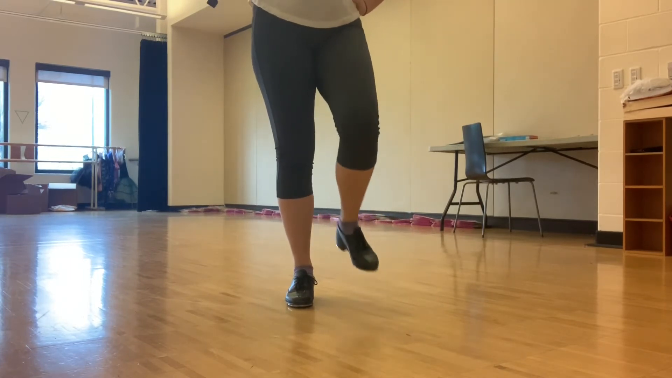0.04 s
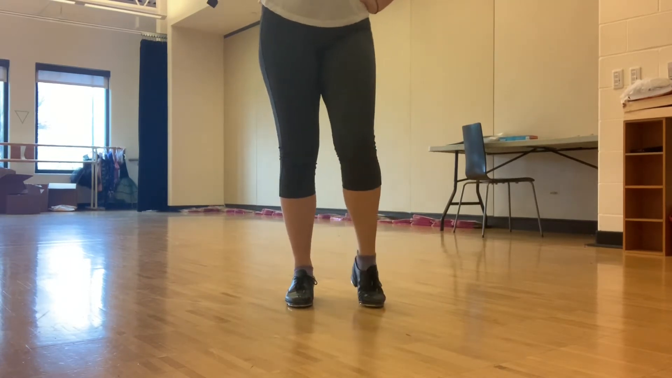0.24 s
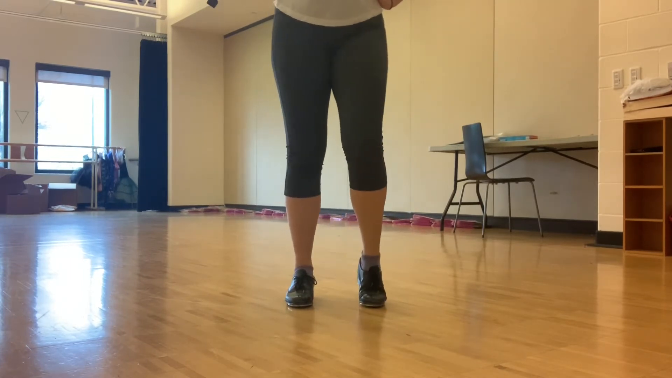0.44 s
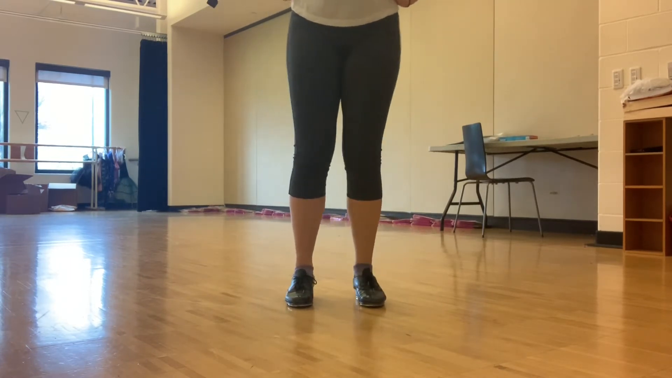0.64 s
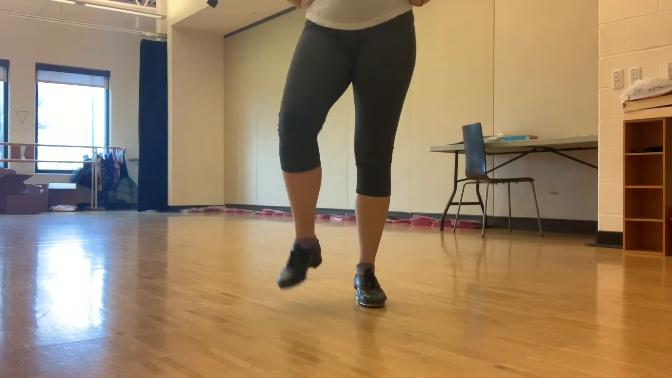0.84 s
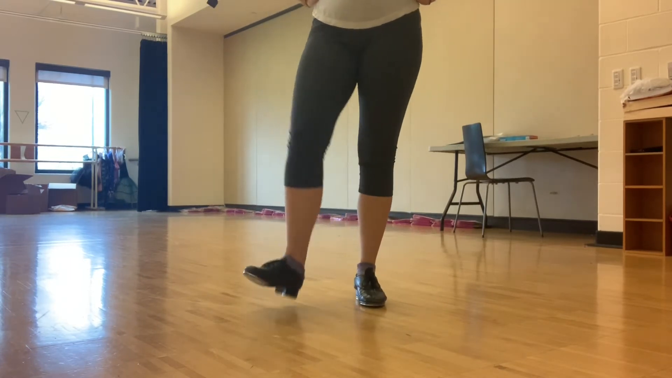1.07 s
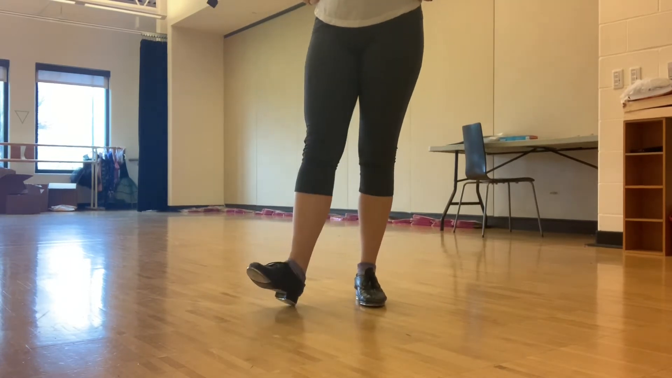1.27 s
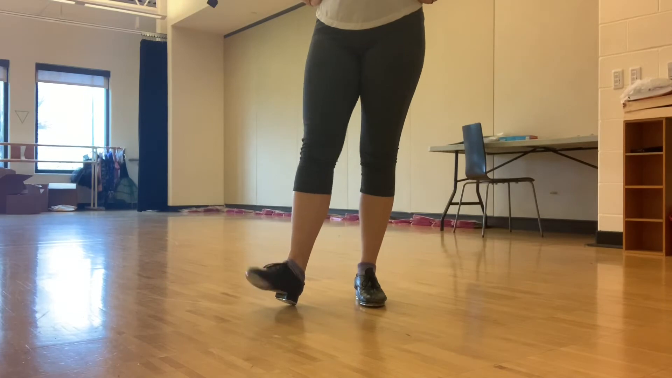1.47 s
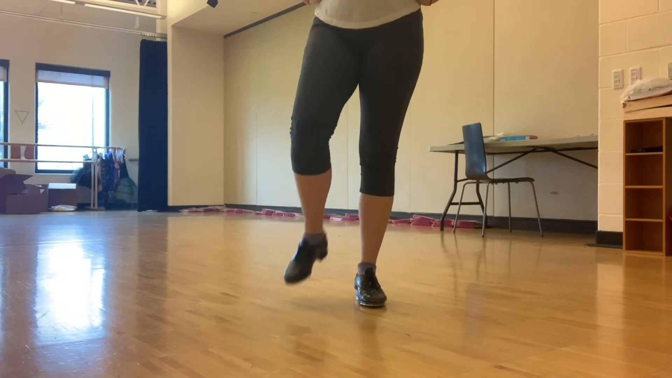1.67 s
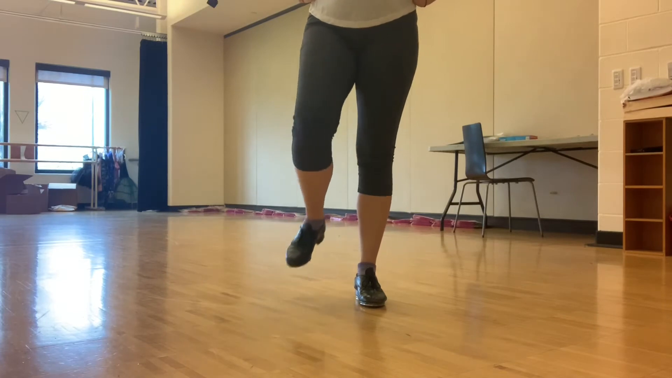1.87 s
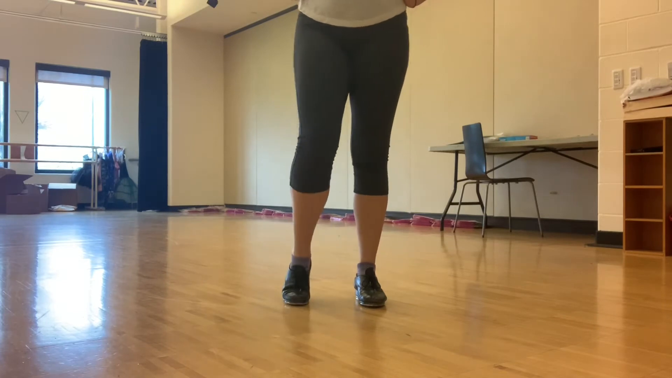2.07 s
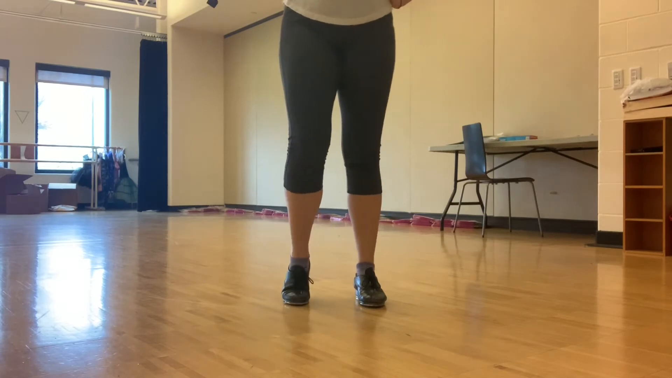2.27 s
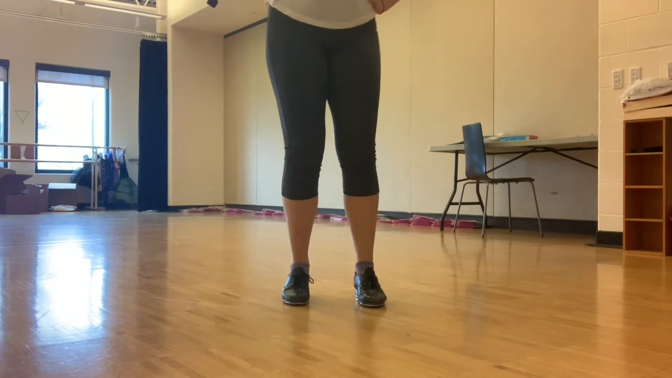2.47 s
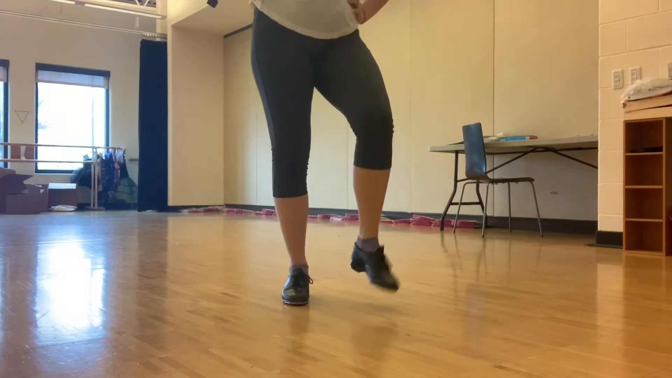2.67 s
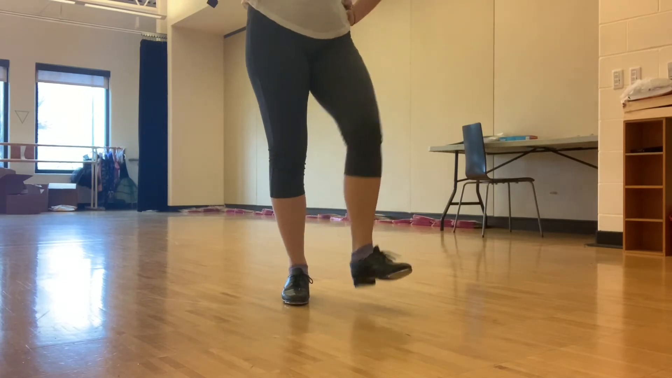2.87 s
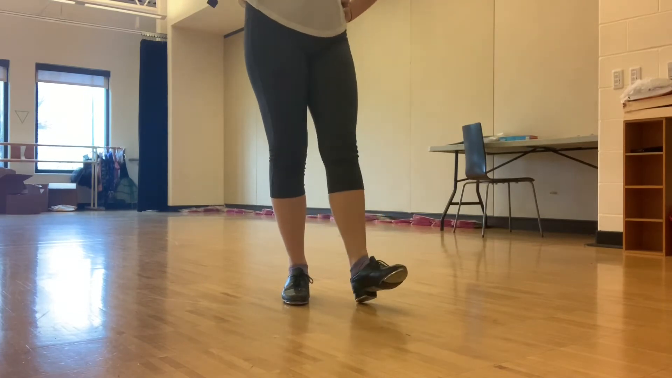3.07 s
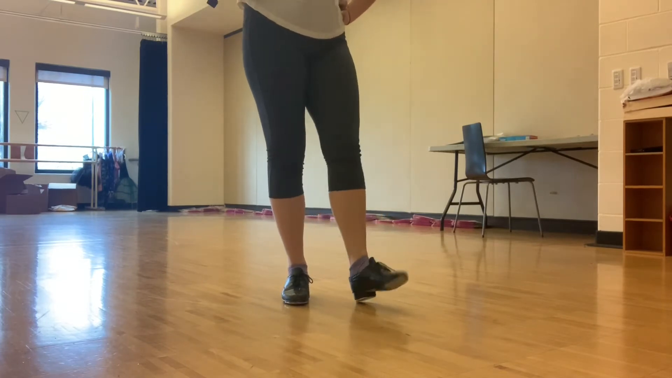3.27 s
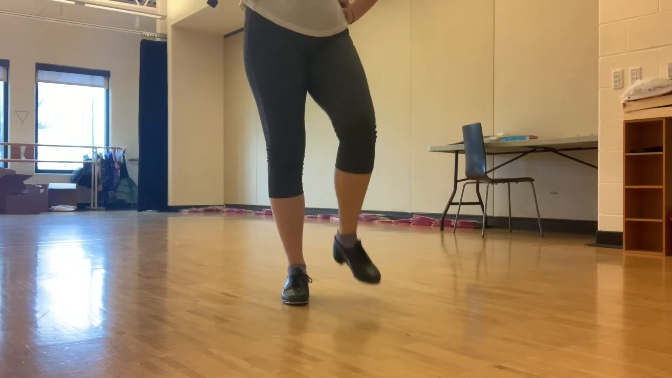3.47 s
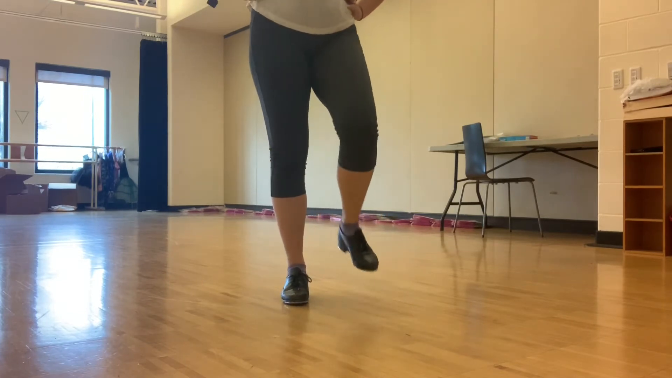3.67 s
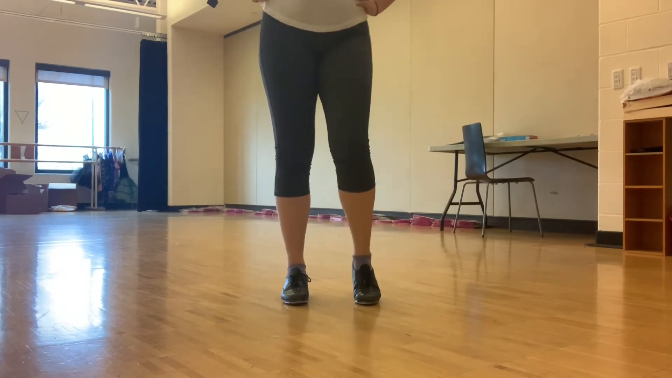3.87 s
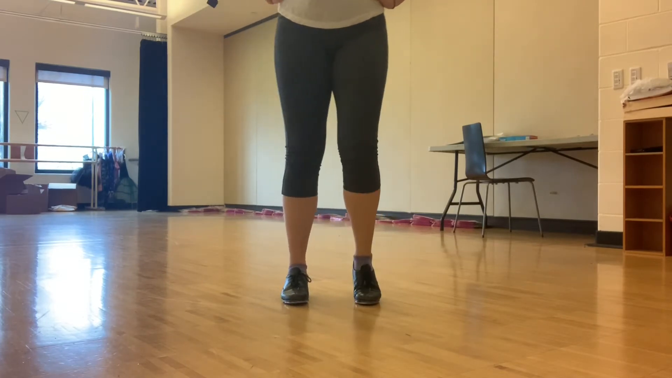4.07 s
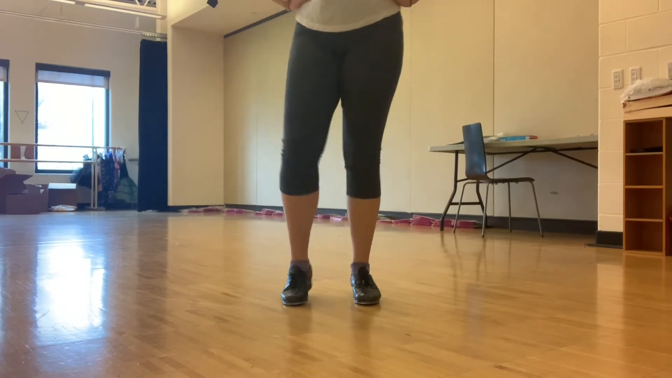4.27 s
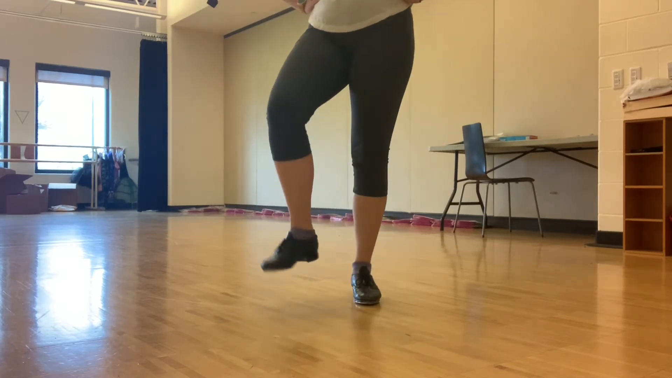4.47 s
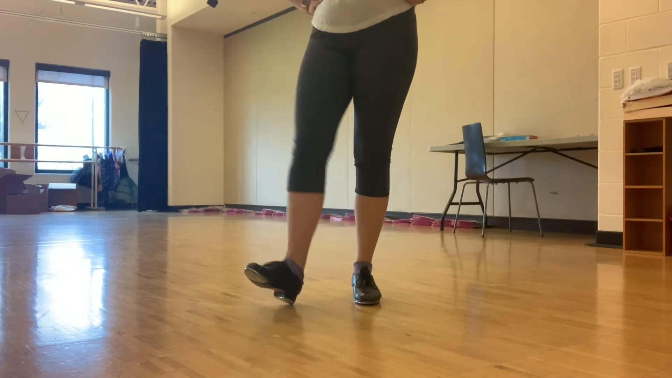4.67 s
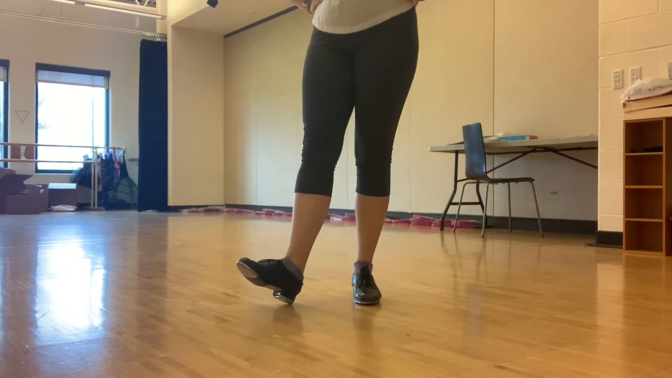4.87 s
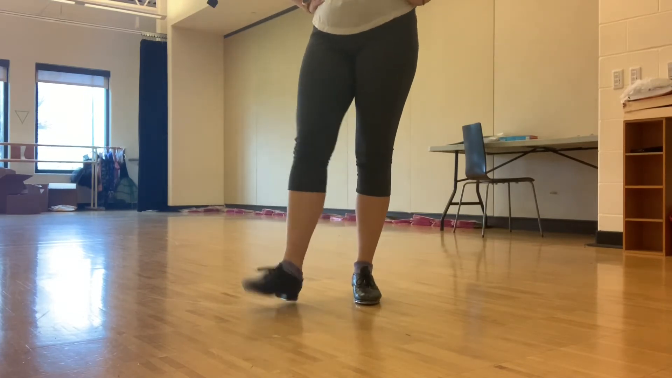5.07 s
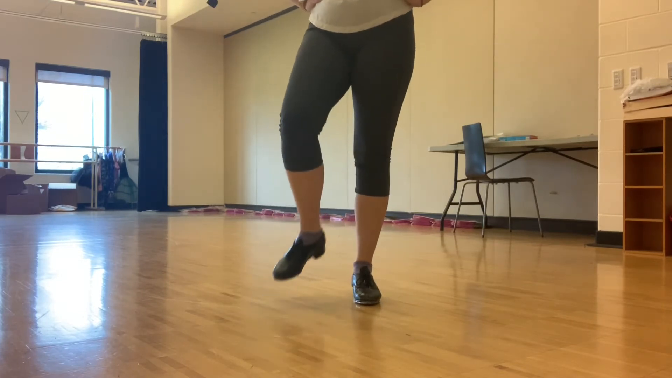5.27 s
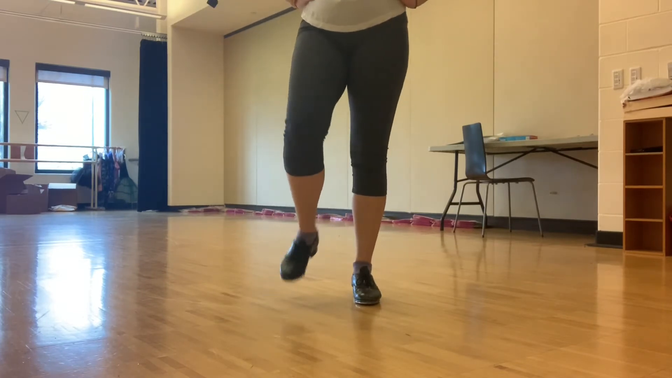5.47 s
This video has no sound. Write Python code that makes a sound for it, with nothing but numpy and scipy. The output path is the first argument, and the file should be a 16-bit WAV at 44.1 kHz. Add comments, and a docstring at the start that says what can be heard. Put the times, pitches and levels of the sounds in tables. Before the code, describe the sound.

Slow, evenly spaced tap shoe strikes crack and knock on a wooden studio floor, ringing in a bare bright room over low ventilation rumble.

```python
"""A dancer in tap shoes works slowly through dig, brush, ball and heel drop on a wooden studio floor.
Each blow shapes a click into the ring of a metal plate and adds dying modes of sole, boards and floor.
Random echo patterns make the chatter near the blow, and fading noise makes the bare room's bright tail.
Ventilation rumbles underneath: shaped noise, with a hum of sine waves that beat together."""
import sys
import numpy as np
from scipy import signal
from scipy.fft import rfft, irfft, next_fast_len
from scipy.io import wavfile

SR = 44100
rng = np.random.default_rng(int(sys.argv[2]) if len(sys.argv) > 2 else 0)


def pcm_store(signal):
    """Save signal as 16-bit PCM."""
    levels = np.round(np.clip(np.atleast_2d(signal), -1, 1) * 32767)
    wavfile.write(sys.argv[1], SR, levels.astype(np.int16).T)


N = 243431  # length of the scene in samples
TAPS = 8192  # length of a click, ring or echo pattern in samples


def amp(db):
    """Turns decibels into a gain."""
    return 10 ** (np.asarray(db) / 20)


def evened(x):
    """Scales a sound to an rms of one."""
    return x / np.sqrt(np.mean(x ** 2) + 1e-20)


def read(points, hz, axis=1):
    """Reads one column of a table, joined by straight lines on a log-frequency axis."""
    columns = np.transpose(points)
    return np.interp(np.log(hz + 1), np.log(columns[0] + 1), columns[axis])


def add(mix, s, sound):
    """Lays a stereo sound into the mix at time s, cutting off what falls outside."""
    start = round(s * SR)
    sound = sound[:, max(-start, 0):]
    part = mix[:, max(start, 0):][:, :sound.shape[1]]
    part += sound[:, :part.shape[1]]


# The step goes dig, brush, ball, heel drop, then changes foot, with a light heel touch here and there.
# Columns: start_s, foot, stroke, force_db, brightness_db_per_octave, ring_hz,
# ring_db (against the force), muting_db
STEP_BLOWS = [ (-.26, "left", "brush", 17, 0, 2170, -3, -1),
              (.2020, "left", "ball", 20, 0.3, 2060, -0.5, 12.5),
              (0.6584, "left", "drop", 14.5, -5.5, 1340, 4.5, 8.5),
              (1.1510, "right", "dig", 21, -3, 2660, -7, 3),
              (1.6110, "right", "brush", 14.5, 4.5, 4050, 6, 19),
              (2.0539, "right", "ball", 18.5, 3, 1960, 6.5, 12.5),
              (2.484, "right", "dig", -6.5, -8, 700, -6, 12), (2.5333, "right", "drop", 7, 4.5, 2360, 2, 2),
              (2.9884, "left", "dig", 26, -5.5, 3660, -6.5, 6.5),
              (3.4, "left", "brush", 21.5, -1.5, 1760, 2, 1.5),
              (3.8490, "left", "ball", 19, 1.3, 1950, -6, 12),
              (4.2856, "left", "drop", 16, -2, 1460, -5, 8.5),
              (4.7293, "right", "dig", 21.5, -2.5, 2740, -8, 4),
              (5.073, "right", "dig", -3.5, -8.5, 690, 0, 8),
              (5.1346, "right", "brush", 22, 2.66, 5600, -3.5, 2)]
# A plate just touches the floor as the weight shifts. Columns: start_s, foot, force_db
LIGHT_GRAZES = [(.6538, "left", -13.5), (2.4343, "right", -1.5), (4.18, "left", -14)]
# All grazes touch alike. Columns: brightness_db_per_octave, ring_hz, ring_db (against the force), muting_db
GRAZE_CONTACT = (-1.5, 11800, -3, 13)


def dance():
    """Plays the strokes of the step, and the light grazes between them."""
    mix = np.zeros((2, N))
    grazes = [(s, foot, "graze", force_db, *GRAZE_CONTACT) for s, foot, force_db in LIGHT_GRAZES]
    for row in STEP_BLOWS + grazes:
        for start, sound in blow(*row):
            add(mix, start, sound)
    return mix


# How each stroke shares out its force. Columns: floor_thump_db, board_knock_db, sole_clack_db, plate_db,
# room_db, muted_band_hz (before the foot's pitch ratio)
FORCE_SHARES = { "dig": (4, 0, -4, 0.5, -2.5, 2098), "brush": (9, -3, 1.5, -4, 0.5, 3330),
                "ball": (5, -4, -3, 0, 1.5, 3084), "drop": (12, -2.5, -5.5, -2, 2, 2500),
                "graze": (10, -7, -4, 0, -3.5, 1600)}
# The two shoes and the spots they land on differ. Columns: extra_floor_thump_db, muted_band_pitch_ratio
FOOT_DIFFERENCES = {"left": (-1.5, 0.98), "right": (1.8, 0.9)}


def blow(s, foot, stroke, force_db, bright_db, ring_hz, ring_db, mute_db,
         sole_lead_s=0.0007, thump_scatter=0.72, board_scatter=1.0):
    """One blow sounds shoe, boards and floor together, then fills the room: a list of (s, stereo sound)."""
    thump_db, knock_db, clack_db, plate_db, room_db, mute_hz = FORCE_SHARES[stroke]
    spot_db, tuning = FOOT_DIFFERENCES[foot]
    metal = shoe(stroke, clack_db, plate_db, bright_db, ring_hz, ring_db, tuning * mute_hz, mute_db)
    sole = amp(clack_db) * sole_knock(foot)
    parts = [(s - sole_lead_s, np.tile(sole, (2, 1)))]
    if stroke == "brush":
        parts.append((s - TAPS / SR, faint_swell(metal)))
        metal = metal + amp(plate_db) * plate_zing()
    thump = amp(thump_db + spot_db) * floor_thump()
    knock = amp(knock_db) * board_knock(foot)

    # part of the wood's sound is scattered close by, the rest is heard plain
    scattered = metal + thump_scatter * thump + board_scatter * knock
    plain = (1 - thump_scatter) * thump + (1 - board_scatter) * knock
    everything = metal + thump + knock
    parts.append((s, signal.fftconvolve(scattered[None], near_field(), axes=1)))
    parts.append((s, np.tile(plain, (2, 1))))
    parts.append((s, amp(room_db) * signal.fftconvolve(everything[None], studio(), axes=1)))
    return [(start, amp(force_db) * sound) for start, sound in parts]


# How plate and shoe ring in each stroke. Columns: pitch_hz, width_hz, level_db (before the plate's share)
SHOE_RESONANCES = { "dig": [(2260, 1200, -10), (3140, 325, -1), (6510, 1240, -13), (11100, 2000, -19.5),
                   (12400, 2400, -34)], "brush": [(2040, 1180, 7.5), (3780, 940, 1.5), (5720, 1740, -6),
                   (7740, 380, -8.5), (10750, 640, -11.5), (12760, 1200, -17.5)],
                   "ball": [(1440, 790, -3.5), (2340, 690, 1.5), (3260, 860, 0), (6330, 800, -14.5),
                   (7500, 1500, -20), (10860, 2600, -20)], "drop": [(1610, 790, -8), (2390, 270, -4),
                   (3610, 1360, -9.5), (5600, 1270, -13.5), (7230, 530, -15.5), (10700, 1300, -22.5)],
                   "graze": [(2500, 1600, -2), (6470, 4300, -4), (11100, 1200, 3.5), (13200, 2300, 0)]}


def shoe(stroke, clack_db, plate_db, bright_db, ring_hz, ring_db, mute_hz, mute_db,
         ring_share=0.19, mute_share=0.24, crack_db=-24, clack_hz=1230, clack_width=260):
    """Metal meets wood: wide resonances, damped by the foot, over a short crack."""
    hz = np.fft.rfftfreq(TAPS, 1 / SR)

    def bump(centre, width):
        """A smooth peak of height one; the width is in Hz."""
        return 1 / (1 + ((hz - centre) / (0.79 * width)) ** 2) ** 2

    power = sum(amp(db) ** 2 * bump(f, width) for f, width, db in SHOE_RESONANCES[stroke])
    power = power + amp(crack_db) ** 2 * bump(1500, 3800)
    power = power * amp(plate_db + bright_db * np.log2((hz + 300) / 2500)) ** 2
    power = power + amp(clack_db) ** 2 * bump(clack_hz, clack_width)
    # the point of contact favours one ring of the plate and mutes one band
    power = power + amp(ring_db) ** 2 * bump(ring_hz, ring_share * ring_hz)
    gain = np.sqrt(power) * amp(-mute_db * bump(mute_hz, mute_share * mute_hz))
    small_plate = hz ** 2 / (hz ** 2 + 300 ** 2)  # a small plate radiates little bass
    return causal(gain * small_plate)


def causal(gain):
    """Makes the sharpest one-sided click that has this spectrum (minimum phase)."""
    log_gain = np.log(np.maximum(gain, 1e-5))
    circle = np.concatenate([log_gain, log_gain[-2:0:-1]])
    return np.fft.ifft(np.exp(np.conj(signal.hilbert(circle)))).real


SWELL_DB, SWELL_S = -15, 0.0046  # level of the noise before a brush, and the time constant of its growth


def faint_swell(metal):
    """A faint noise in the plate's colour swells for a few milliseconds before the blow."""
    ahead = np.arange(TAPS, 0, -1) / SR  # seconds left until the blow
    noise = rng.standard_normal((2, TAPS)) * np.exp(-ahead / SWELL_S)
    noise *= amp(SWELL_DB) / np.linalg.norm(noise, axis=1, keepdims=True)
    return signal.fftconvolve(metal[None], noise, axes=1)


def ringing(modes, lag=.002, rise=.002):
    """Dying modes; bending waves are slow, so low ones swell late (lag and rise in s at 300 Hz)."""
    t = np.arange(TAPS) / SR
    out = np.zeros(TAPS)
    for hz, db, t60 in modes:
        age = np.maximum(t - lag * np.sqrt(300 / hz), 0)
        ring = (1 - np.exp(-age * hz / (300 * rise))) * amp(-60 * age / t60)
        out += amp(db) * 2 * ring / ring.sum() * np.sin(2 * np.pi * hz * age)
    return out


# A plate that flies clear of the floor after a brush sings on briefly.
# Columns: pitch_hz, level_db (against the plate), fade_by_60_db_s
ZING_MODES = [(1740, -15, 0.11), (2520, -7, 0.21), (3310, 8.5, 0.15), (5405, -11, 0.12), (5600, 1, 0.067),
              (5760, -19, 0.12), (5930, -16, 0.16)]


def plate_zing():
    """The free plate rings in several modes, with no floor to damp it."""
    return ringing(ZING_MODES, lag=0.000047, rise=0.00078)


# The stiff sole of each foot. Columns: pitch_hz, level_db (before the stroke's clack), fade_by_60_db_s
SOLE_MODES = {"left": [(1237, -0.5, 0.0089), (1624, -12.5, 0.0047), (1810, -19, 0.05)],
              "right": [(1143, 3.5, 0.02), (1590, -16, 0.053)]}


def sole_knock(foot):
    """The stiff sole knocks straight along the floor in quick, short modes."""
    return ringing(SOLE_MODES[foot], lag=.0001, rise=0.0031)


# The boards under each foot. Columns: pitch_hz, level_db (before the stroke's knock), fade_by_60_db_s
BOARD_MODES = { "left": [(310.8, 7, 0.023), (397.7, 4, 0.072), (436, -1.5, 0.03), (627, 4, 0.059),
               (700, 0, 0.018), (797, -22, 0.0074)], "right": [(346.4, 4.5, 0.035), (404, 3.5, 0.012),
               (628.6, 4, 0.042), (682, -2, 0.016), (1022, -6, 0.018)]}


def board_knock(foot):
    """The boards under the foot bend and ring at their own pitches."""
    return ringing(BOARD_MODES[foot], lag=0.0007, rise=0.012)


# The sprung floor as a whole. Columns: pitch_hz, level_db (before the stroke's thump), fade_by_60_db_s
FLOOR_MODES = [(133.6, -7.5, 0.23), (161, 0.5, 0.027), (209, -5, 0.022)]


def floor_thump():
    """The whole floor gives way slowly in a few deep modes."""
    return ringing(FLOOR_MODES, lag=0.0029, rise=0.0093)


# Near walls and ceiling. Columns: delay_s (before a tiny random delay is added), left_db, right_db
FIRST_ECHOES = [(.0021, -13, -43), (0.0099, -22, -11), (0.054, -26, -24)]


def near_field(direct_db=-3.5, chatter_db=-4.0, chatter_s=0.013, port_lag=.00005):
    """The direct blow, the chatter of plate and boards just after it, and the first echoes."""
    t = np.arange(TAPS) / SR
    cloud = rng.standard_normal((2, TAPS)) * np.exp(-t / chatter_s) * (1 - np.exp(-t / 0.00051))
    paths = amp(chatter_db) * cloud / np.linalg.norm(cloud, axis=1, keepdims=True)
    paths[0, round(port_lag * SR)] += amp(direct_db)  # the left side hears the blow slightly later
    paths[1, 0] += amp(direct_db)
    for delay, left_db, right_db in FIRST_ECHOES:
        at = round(delay * SR) + rng.integers(0, 16, size=2)
        paths[[0, 1], at] += amp([left_db, right_db])
    return paths


# How long the bare room rings. Columns: pitch_hz, fade_by_60_db_s
ROOM_FADE = [(150, 0.42), (400, 0.76), (1000, 0.54), (2200, 0.7844), (4000, 0.87), (7000, 0.85),
             (12000, .5), (16000, 0.56)]
# How strongly the room answers. Columns: pitch_hz, tail_level_db (before the stroke's room share)
ROOM_LEVEL = [(100, -3), (200, -2), (600, -4.5), (1200, -9.5), (2000, -2.5), (3000, -1), (4500, 0.5),
              (7000, 1), (12000, -6), (16000, -14)]


def studio(build_s=0.012, same=0.34):
    """A diffuse tail of noise, drawn anew for every blow, each band dying at its own speed."""
    a, b = rng.standard_normal((2, int(1.3 * SR)))
    same = np.clip(same, -1, 1)  # left-right likeness
    noise = np.array([a, same * a + np.sqrt(1 - same ** 2) * b])
    hz, t, bands = signal.stft(noise, SR, nperseg=256)
    t60 = read(ROOM_FADE, hz)[:, None]
    unit = np.sqrt(2 * np.log(1000) / (t60 * SR))  # gives slow and quick fades the same energy
    fade = np.exp(-np.log(1000) * t / t60)
    level = amp(read(ROOM_LEVEL, hz))[:, None]
    tail = signal.istft(bands * unit * fade * level, SR, nperseg=256)[1]
    return tail * (1 - np.exp(-np.arange(tail.shape[1]) / SR / build_s))


# Tone of the ventilation noise. Columns: pitch_hz, level_db_per_hz (only the shape counts)
AIR_TONE = [(20, -38), (32, -15), (45, -1.5), (62, 4), (95, -1.5), (135, -7.5), (200, -24.5), (300, -25),
            (600, -32.5), (1200, -40.5), (3000, -38.5), (7500, -45.5), (10000, -57.5), (16000, -71)]
# How alike the noise is on both sides. Columns: pitch_hz, left_right_likeness (1 is identical)
AIR_LIKENESS = [(60, 1), (130, 0.69), (300, 0.34), (1000, 0.4), (8000, 0.34)]
# Fans at nearly the same speed beat against each other. Columns: pitch_hz, level_db
FAN_HUM = [(58.36, -42), (57.8, -55), (59.5, -53.5)]
AIR_DB = -39  # level of the ventilation noise


def ventilation():
    """Duct rumble with a faint hiss from shaped noise, and the beating hum of the fans."""
    hz = np.fft.rfftfreq(N, 1 / SR)
    a, b = rfft(rng.standard_normal((2, N)))
    same = np.clip(read(AIR_LIKENESS, hz), -1, 1)
    noise = np.array([a, same * a + np.sqrt(1 - same ** 2) * b])
    air = irfft(noise * amp(read(AIR_TONE, hz)), N)
    t = np.arange(N) / SR
    hum = sum(amp(db) * evened(np.sin(2 * np.pi * (fan_hz * t + rng.random()))) for fan_hz, db in FAN_HUM)
    return amp(AIR_DB) * evened(air) + hum


def scene():
    """The dancer in the ventilated studio."""
    return dance() + ventilation()


# The microphone pair. Columns: pitch_hz, shared_level_db, difference_level_db
PORT_TONE = [(69, -2.5, -10), (210, -1, 1.5), (1020, 2, 5.5), (6650, -1.5, 1), (8310, -6, 7.5),
             (8460, -42.5, 12.5), (9070, -40.5, 0.5), (10340, -2.5, 12), (12660, 3.5, -15), (14500, 7, -22),
             (16000, -9, -17)]
# Which side is louder. Columns: pitch_hz, left_minus_right_db
SIDE_BALANCE = [(50, 5.5), (100, -0.5), (170, 12), (350, 2), (700, -0.5), (2500, .5), (5000, 2),
                (9000, 1.5)]
EDGE_HZ = 16000  # cutoff of the band limit


def record(dry):
    """Two close ports that oppose each other near 9 kHz, soft overload on the peaks, then the band limit."""
    size = next_fast_len(N + TAPS)
    hz = np.fft.rfftfreq(size, 1 / SR)
    left, right = rfft(dry, size)
    mid = (left + right) / 2 * amp(read(PORT_TONE, hz, axis=1))
    side = (left - right) / 2 * amp(read(PORT_TONE, hz, axis=2))
    lean = amp(read(SIDE_BALANCE, hz) / 2)
    heard = irfft(np.array([(mid + side) * lean, (mid - side) / lean]), size)[:, :N]
    heard = heard / (1 + (heard / .9) ** 4) ** .25  # peaks bend smoothly towards 0.9
    band_limit = signal.firwin(201, EDGE_HZ, window=("kaiser", 9), fs=SR)
    return signal.oaconvolve(heard, band_limit[None], "same")


dry = scene()
out = record(dry)
pcm_store(out)
```